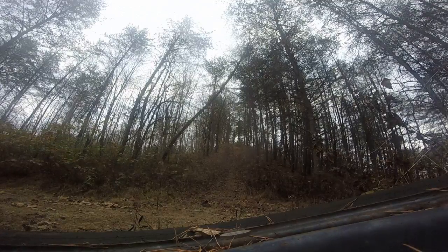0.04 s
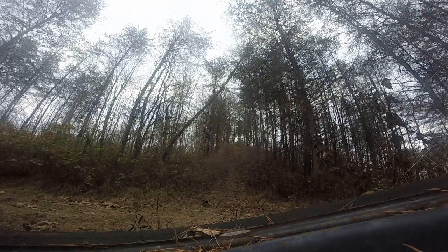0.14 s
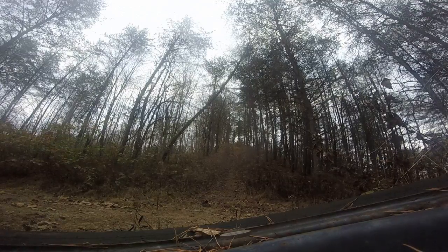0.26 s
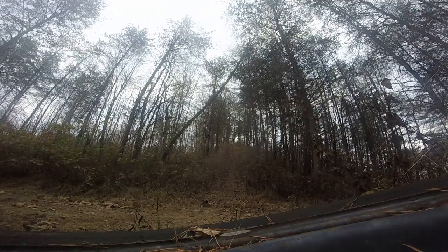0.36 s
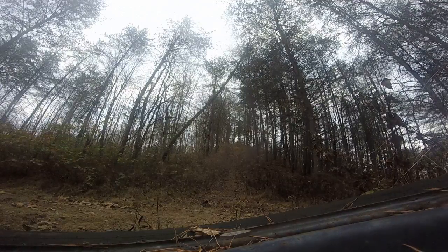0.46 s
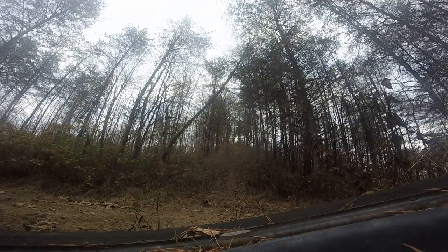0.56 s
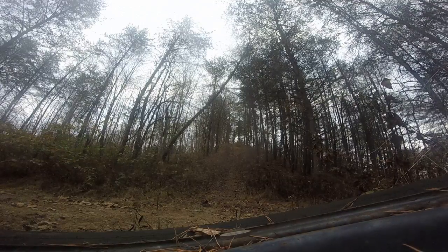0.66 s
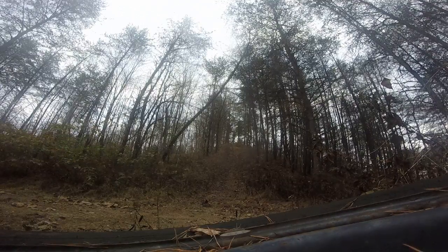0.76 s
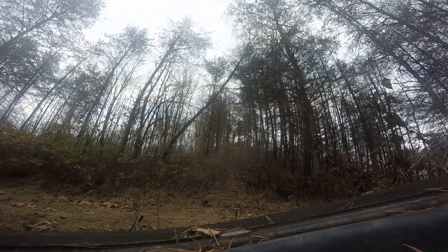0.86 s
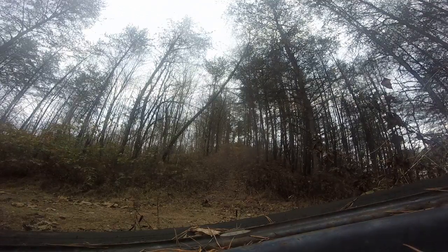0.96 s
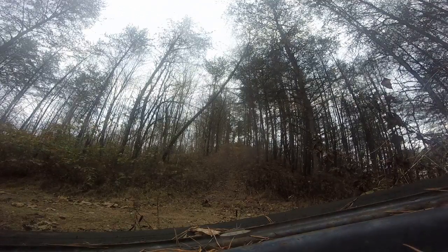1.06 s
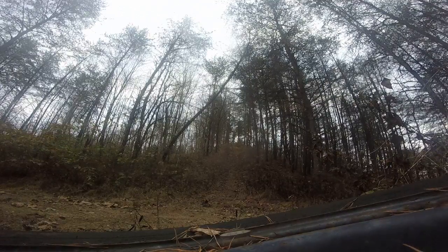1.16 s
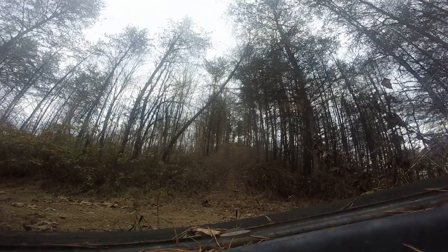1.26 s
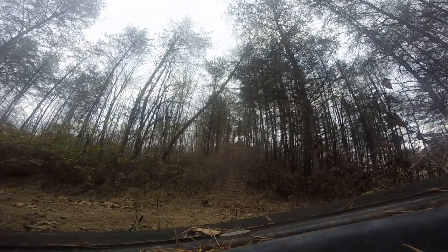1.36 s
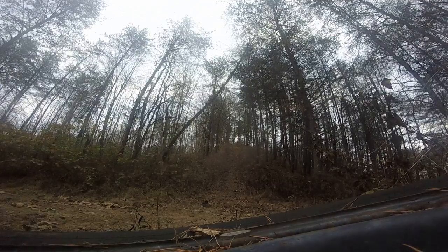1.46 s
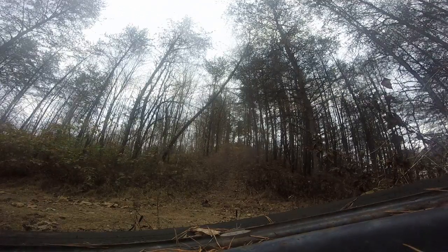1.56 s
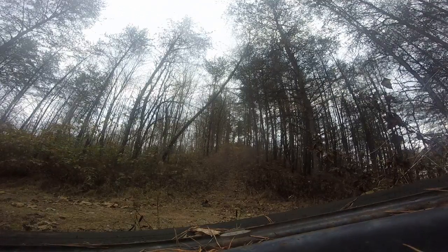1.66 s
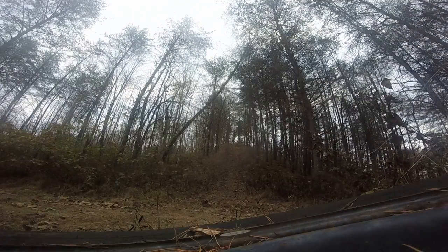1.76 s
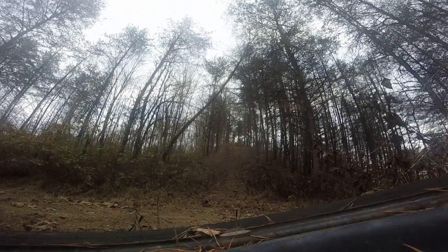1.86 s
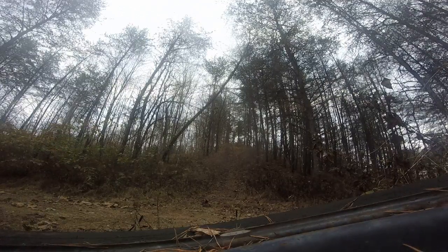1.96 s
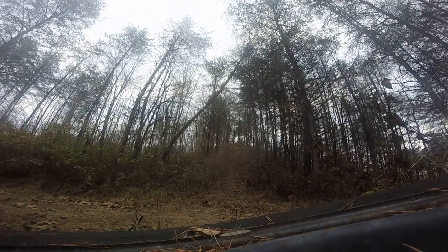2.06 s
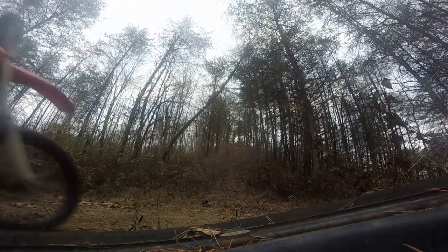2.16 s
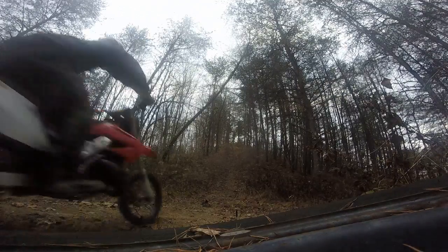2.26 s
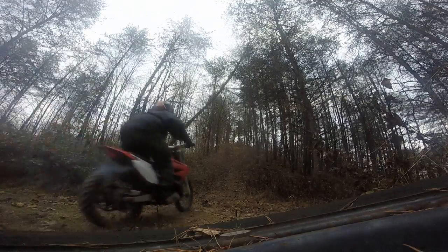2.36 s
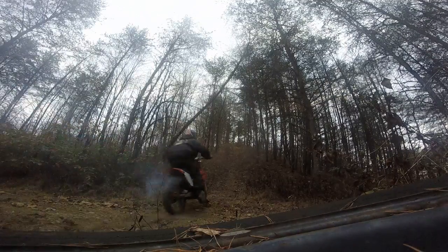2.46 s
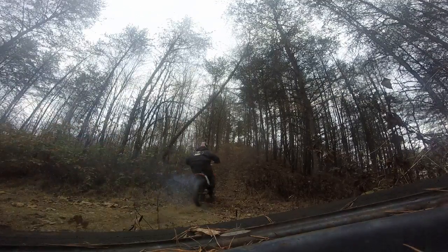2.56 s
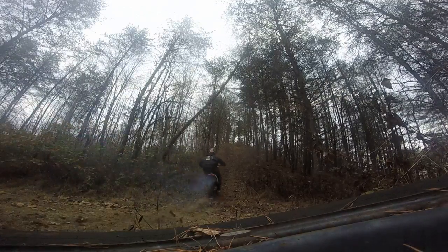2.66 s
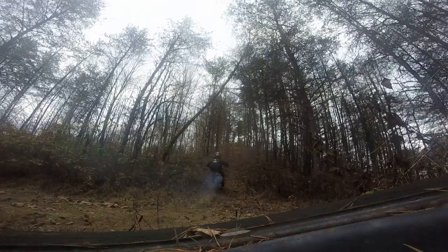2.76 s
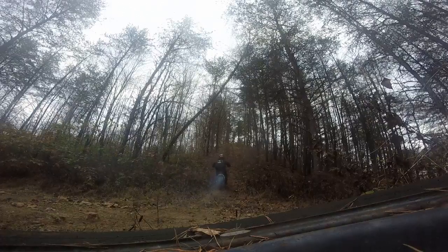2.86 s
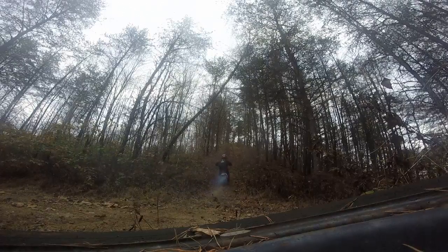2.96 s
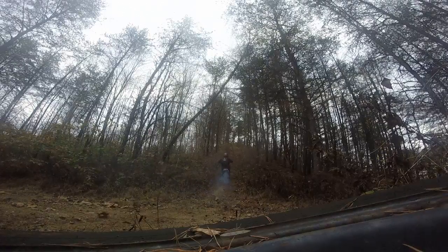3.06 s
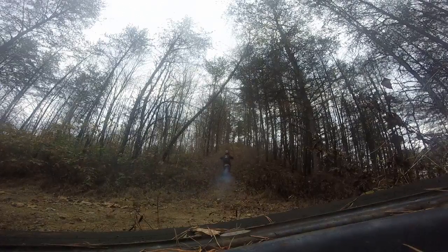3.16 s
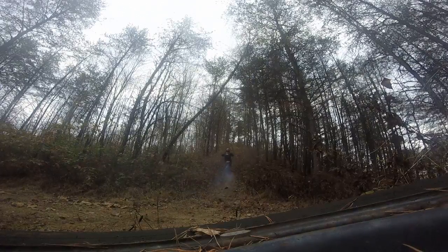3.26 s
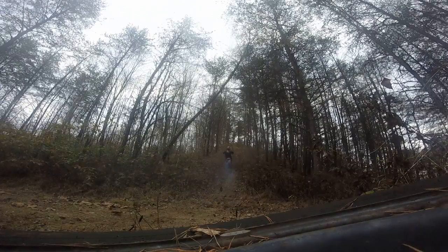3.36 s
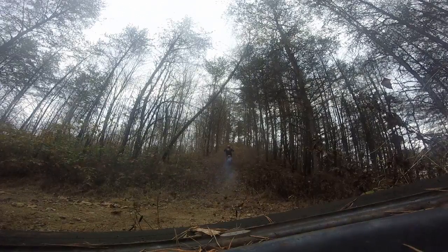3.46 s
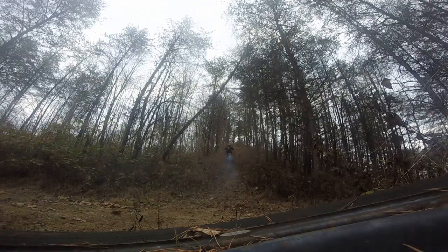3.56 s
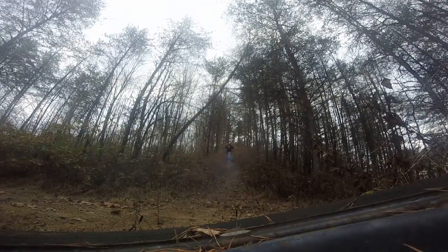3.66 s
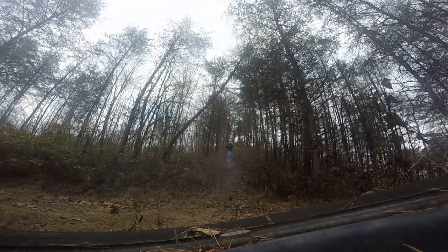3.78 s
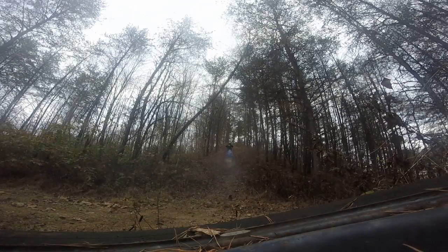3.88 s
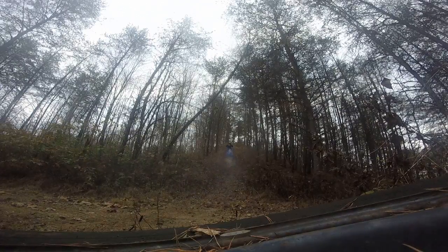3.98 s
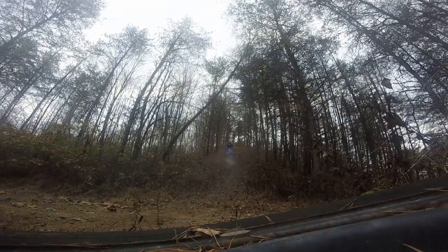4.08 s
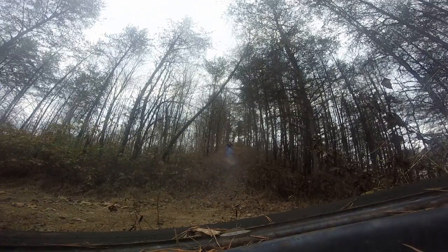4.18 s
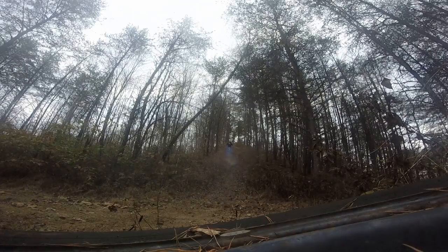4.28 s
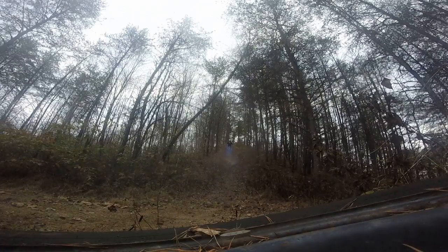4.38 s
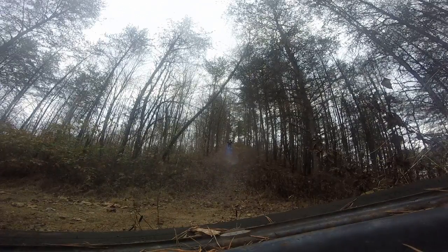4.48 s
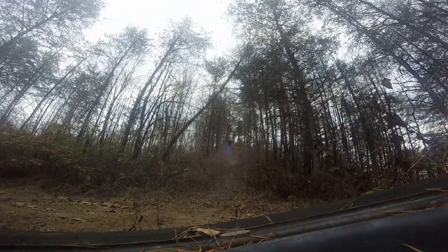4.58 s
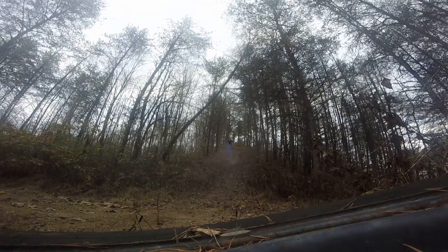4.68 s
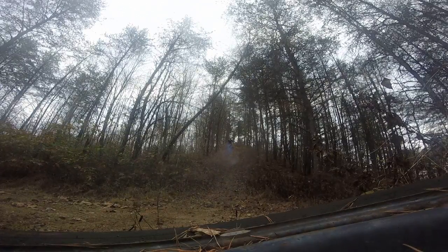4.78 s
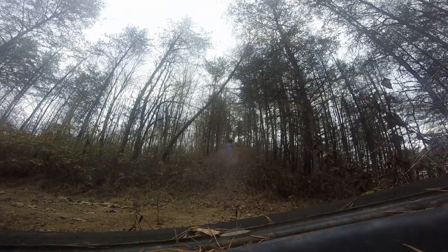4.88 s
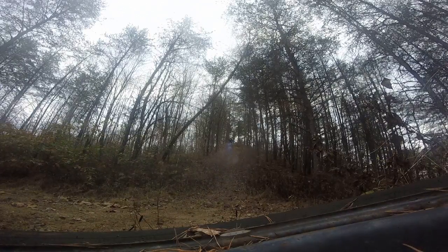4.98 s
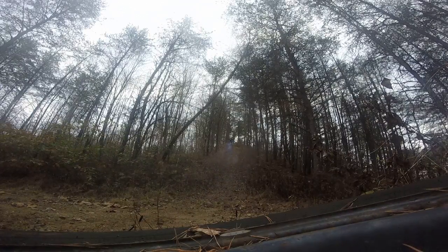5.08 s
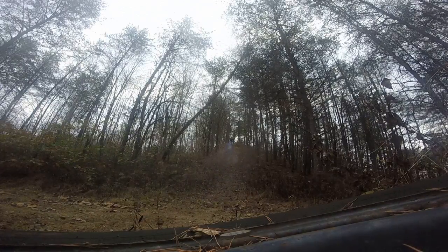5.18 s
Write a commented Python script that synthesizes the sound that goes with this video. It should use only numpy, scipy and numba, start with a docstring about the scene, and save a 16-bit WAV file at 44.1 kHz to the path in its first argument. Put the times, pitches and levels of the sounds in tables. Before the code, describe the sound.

A two-stroke dirt bike buzzes in from behind, blasts past very close with a harsh rasp, then climbs away ringing up a wooded trail.

```python
"""A faint buzz and a short gear whine over rumbling woods come first: a two-stroke dirt bike nears from behind.
It passes close to a listener on the ground and climbs away up a wooded trail. Each firing sends a smooth
pressure wave (sine waves locked to the crank) and a sharp crack (a click that rings the metal) out of the pipe.
The engine side is heard first, the ringing tailpipe once it has passed; echoes off tree trunks blur both.
The back tyre bites with a crunch and sprays dirt and leaves, both made of grainy noise."""
import sys
import numpy as np
from scipy import signal
from scipy.fft import rfft, irfft
from scipy.io import wavfile
from scipy.ndimage import uniform_filter1d
from numba import njit

SR = 44100
rng = np.random.default_rng(int(sys.argv[2]) if len(sys.argv) > 2 else 0)


def generate_wav(signal):
    """Clip the signal to [-1, 1] and save it as 16-bit WAV at the path in sys.argv[1]."""
    frames = np.transpose(np.atleast_2d(signal))
    scaled = np.clip(frames, -1, 1) * 32767
    pcm = np.round(scaled).astype(np.int16)
    wavfile.write(sys.argv[1], SR, pcm)


N = 230622
TIME = np.arange(N) / SR  # seconds
# The exhaust wave in each stage of the ride, from far off, past the listener, to far up the trail.
# Columns: start_s [s, midway through the change], uneven_db [dB, rumble of uneven combustion],
# multiple_1_db to multiple_5_db [dB, multiples of the firing rate]; dB are relative to the drone level
WAVE_SHAPES = [(0.0, -16, -8, 0, -20, -14.5, -32), (0.74, -19.5, -14, -0.5, -21, -17.5, -22.5),
               (1.25, -16, -10, -0.5, -27, -19.5, -40), (1.69, -12.5, -3, -13.5, -17, -26, -20),
               (2.0, -14, 1, -12, -9, -10, -16), (2.17, -11, -1, -11, -13, -11.5, -6),
               (2.35, -8, -7, -0.5, -20.5, -10, -19), (2.55, -10.5, -0.5, -1, -7, -11, -32),
               (3.12, -12, 1.5, -6.5, -12, -12.5, -22), (3.44, -11.5, 0.5, -9, -18.5, -12.5, -7.5),
               (3.82, -13, -3, -1.5, -27, -10.5, -8), (4.12, -12.5, -1, -8.5, -23, -8, -8.5)]
WAVE_CHANGE_S = 0.019  # how gradually one wave shape gives way to the next
PASSED_S, FAR_S = 2.35, 3.91  # the pipe swings into view; the bike is deep in the woods


def bark(turns, surge_hz):
    """The sharp sound in three bands; rasp and hiss swell with rev surges, the body too once the bike has passed."""
    # Overall level of the sharp sound. Columns: time_s [s], level_db [dB]
    bark_levels = [(0.0, -52), (0.24, -48.5), (0.62, -57), (1.55, -41.5), (1.88, -28), (2.11, -13.9),
                   (2.28, -11.5), (2.35, -23.5), (2.59, -19.5), (2.75, -25), (3.0, -24), (3.34, -22),
                   (3.58, -27.5), (3.73, -24.5), (3.84, -31.5), (4.1, -29), (4.5, -30), (4.75, -27.5),
                   (5.23, -32.5)]
    # Sound arriving by way of the trunks. Columns: time_s [s], echo_db [dB over the direct sound]
    trunk_levels = [(0, 5), (1.5, 2), (2.2, -6), (2.55, -11), (2.9, -8), (3.5, -4), (4.0, 0), (5.23, 1)]
    # Brightness in each stage of the ride, relative to the bark. Columns: start_s [s, midway through the change],
    # rasp_db [dB], hiss_db [dB, gas hiss], top_db [dB, extra top treble]; rasp and hiss get a fixed trim below
    brightness = [(0.0, -4.5, -17.5, -18), (0.4, -2, -15, -14), (1.25, -3.5, -13, -13), (1.69, 0, -8, 7.5),
                  (1.93, -2.8, -14, 8.5), (2.17, -8, -16, 1), (2.44, -12.5, -23.5, -4),
                  (2.72, -10, -21.5, 0), (3.25, -8.5, -21, 1)]
    brightness_change_s = 0.037
    body_db_per_hz, rasp_db_per_hz, hiss_db_per_hz = 0.1739, 0.17, 0.12  # gain for each Hz of rev surge

    # the pipe swings about as the bike bounces, more so up the trail
    flutter_spread_db = np.interp(TIME, [PASSED_S, FAR_S], [0.96, 1.76])
    flutter_db = flutter_spread_db * walk(24.036)
    passed = turn_to(PASSED_S, .03)
    direct = (1 - passed) * engine_side(turns) + passed * tailpipe(turns, flutter_db)
    echoes = scatter(direct, t60=0.67, grain_db=6, count=22, size=30)
    heard = direct + undb(curves(trunk_levels)[0]) * echoes

    rasp_db, hiss_db, top_db = stages(brightness, brightness_change_s)
    body_gain = undb(-0.73 + passed * (flutter_db + body_db_per_hz * surge_hz))
    rasp_gain = undb(rasp_db - 2 + rasp_db_per_hz * surge_hz + 0.33 * flutter_db)
    hiss_gain = undb(hiss_db - 1.16 + hiss_db_per_hz * surge_hz)
    body = body_gain * steady(band(heard, 545, 2076))
    rasp = rasp_gain * steady(band(heard, 1829, 4950))
    hiss = hiss_gain * steady(band(heard, 4330, 22300))
    hiss = hiss + (undb(top_db) - 1) * band(hiss, 10500, 23000)
    return undb(curves(bark_levels)[0]) * (body + rasp + hiss)


def engine_side(turns):
    """Intake and cylinder clatter: each blow rattles through the frame, and the intake sucks air once a turn."""
    # Broad colour from the front and from the flank of the bike. Columns: pitch_hz [Hz], level_db [dB]
    front_colour = [(300, -25), (500, -13), (680, -36), (850, -0.5), (1200, 2), (1700, -1), (2100, -7.5),
                    (2900, -9), (3800, -22), (4700, -25), (6500, -6.5), (8700, -10.5), (10000, -22),
                    (14500, -38)]
    flank_colour = [(300, -28), (500, -11), (680, -21), (850, -0.5), (1200, -7), (1700, 0.5), (2100, -10.5),
                    (2900, -11.5), (3800, -21), (4700, -31.5), (6500, -25), (8700, -30.5), (10000, -38.5),
                    (14500, -48.5)]
    # Narrow peaks and dips on top of it. Columns: centre_hz [Hz], width_hz [Hz], peak_db [dB]
    front_modes = [(920, 130, 4), (1200, 200, -3), (1790, 200, 2), (2040, 200, -6), (2560, 170, 3),
                   (2790, 140, -4), (3030, 150, 4), (3230, 140, -7), (3450, 230, 7), (4500, 400, -4),
                   (5200, 350, 5), (6100, 600, -5), (6950, 500, 4)]
    flank_modes = [(930, 90, 2), (1055, 90, 7), (1220, 120, -2), (1445, 90, 6), (1740, 160, 2),
                   (2020, 240, -6), (2350, 200, -3), (2590, 180, 4), (2770, 130, -7), (3030, 190, 6),
                   (3230, 130, -9), (3430, 220, 7), (4150, 200, 2), (5700, 250, -5), (8120, 400, 6)]

    cracks, size = firings(turns, scatter_db=1.8, jitter_s=.00003)
    clatter = unit(scatter(cracks, t60=0.059, grain_db=4.0, count=28, size=3))
    gusts = puffs(turns, size, length=1.0, rest=1.0)
    air = colour(gusts, [(300, -9.5), (1600, -10), (3500, 6.0), (8000, 0.5)])
    front = unit(colour(clatter + undb(9) * air, front_colour, front_modes))
    flank = unit(colour(clatter + undb(1.0) * air, flank_colour, flank_modes))
    beside = turn_to(1.926, 0.065)
    return (1 - beside) * front + beside * flank


def tailpipe(turns, flutter_db):
    """Cracks ring the silencer; above its ringing tones the gas jet takes over."""
    # The cracks lose their edge in the silencer. Columns: pitch_hz [Hz], level_db [dB]
    silencer = [(300, -7.5), (1800, -8.5), (3500, -22.5), (7000, -26)]
    # Colour of the gas jet beside the cracks, weak at low pitch. Columns: pitch_hz [Hz], level_db [dB]
    jet_colour = [(300, -15), (1500, -12), (3000, -3), (7000, 1)]
    # Broad colour from behind, and from far up the hill. Columns: pitch_hz [Hz], level_db [dB]
    rear_colour = [(300, -14), (500, -43), (680, -25), (850, -0.5), (1200, 1), (1700, -5), (2100, -3),
                   (2900, -16), (3800, -16.5), (4700, -30), (6500, -35), (8700, -43.5), (10000, -43),
                   (14500, -71)]
    uphill_colour = [(300, -30), (500, -18), (680, 0.5), (850, 2.5), (1200, 6), (1700, -1), (2100, 5.5),
                     (2900, -8.5), (3800, -13.5), (4700, -28), (6500, -34), (8700, -41.5), (10000, -47),
                     (14500, -68)]
    # Narrow peaks and dips of the pipe. Columns: centre_hz [Hz], width_hz [Hz], peak_db [dB]
    pipe_modes = [(543, 70, 0), (772, 270, -8.5), (876, 310, 11.5), (969, 55, -23), (1257, 73, 9.5),
                  (1591, 210, 8), (1959, 130, -16.5), (2133, 63, 4), (2369, 76, -17), (2825, 290, 6.5),
                  (3230, 140, 1.5), (4120, 230, 2.5), (4630, 730, -10), (8600, 930, 8), (9820, 350, -11)]
    # Strongest ring as throttle and heading change. Columns: time_s [s], pitch_hz [Hz],
    # boost_db [dB, before the flutter is added]
    ring_track = [(2.35, 1109, -2), (2.47, 1160, 15), (2.53, 1160, 10), (2.57, 1536, 13.5),
                  (2.95, 1520, 10.5), (3.05, 1302, 18), (3.19, 1546, 6), (3.31, 1165, 11), (3.5, 1098, -1),
                  (3.7, 1403, 4), (4.5, 1389, -7), (4.67, 1189, 2.5), (5.23, 1309, 2.5)]
    ring_swing = 1.6  # dB the ring gains for each dB of flutter

    cracks, size = firings(turns, scatter_db=0.5, jitter_s=.000025)
    jet = puffs(turns, size, length=.35, rest=.3)
    blows = colour(cracks, silencer) + colour(jet, jet_colour)
    near_pipe = unit(colour(blows, rear_colour, pipe_modes))
    far_pipe = unit(colour(blows, uphill_colour, pipe_modes))
    far = turn_to(FAR_S, 0.12)
    pipe = (1 - far) * near_pipe + far * far_pipe
    ring_hz, boost_db = curves(ring_track)
    ring = resonate(pipe, ring_hz, 200)  # 200 Hz wide
    return pipe + (undb(boost_db + ring_swing * flutter_db) - 1) * ring


def drone(turns, level_db):
    """The round exhaust wave: five sines whose balance follows the ride, each fluttering a little."""
    wave = np.zeros(N)
    for k, shape_db in enumerate(stages(WAVE_SHAPES, WAVE_CHANGE_S)[1:], 1):
        flutter_db = 0.5 * k * walk(35)
        gain = np.sqrt(2) * undb(level_db + shape_db + flutter_db)  # a sine's peak is sqrt(2) times its rms
        wave += gain * np.sin(2 * np.pi * k * turns)
    return wave


def roost():
    """The back tyre bites with a crunch, then throws a short spray of dirt and dry leaves: noise in rough grains."""
    grains = rng.standard_normal(N) * undb(5 * rng.standard_normal(N))
    crunch = colour(grains, [(400, -15), (1200, 10.5), (2200, -3), (3700, -13), (5000, -12), (8000, -14),
                             (15000, -42)])
    spray = colour(grains, [(1000, -20), (3600, -4), (4700, -24), (5700, -1), (6800, -30), (9000, -79),
                            (11500, -21), (15000, -49)])
    bite_gain = undb(-20) * swell(2.368, rise_s=0.015, hold_s=0, fall_s=0.045)
    spray_gain = undb(-37.5) * swell(2.508, rise_s=0.2, hold_s=0.042, fall_s=0.15)
    return bite_gain * unit(crunch) + spray_gain * unit(spray)


def whine(turns, order=9):
    """Gear whine of the first burst of throttle: a wavering tone at nine times the crank speed."""
    level = undb(-54 + 2.4 * walk(50)) * swell(.12, rise_s=.5, hold_s=0, fall_s=0.42)
    return np.sqrt(2) * level * np.sin(2 * np.pi * order * turns + 1.1 * walk(63))


def rumble(drone_db):
    """Uneven combustion fills in between the low lines as noise, over the faint low rumble of the woods."""
    # Colour of the woods. Columns: pitch_hz [Hz], level_db [dB]
    woods_colour = [(15, -18), (25, 4), (82, 1.5), (147, -0.5), (194, 1), (291, -14), (454, -5), (700, -26),
                    (910, -54), (1540, -120)]
    churn_colour = [(30, -28), (60, -4.5), (85, -7.5), (200, 3.5), (350, -6), (600, -6), (900, -5.5),
                    (2000, -32.5)]  # (Hz, dB)
    churn = unit(colour(rng.standard_normal(N), churn_colour))
    woods = unit(colour(rng.standard_normal(N), woods_colour))
    uneven_db = stages(WAVE_SHAPES, WAVE_CHANGE_S)[0]
    churn_gain = np.hypot(undb(drone_db + uneven_db), undb(-57))  # never below -57 dB
    woods_gain = undb(-55.5 + 0.5 * walk(3.1))
    return churn_gain * churn + woods_gain * woods


def firings(turns, scatter_db, jitter_s):
    """One crack per crank turn, each with its own size and timing; also the size of the turn in progress."""
    count = np.arange(1, int(turns[-1]))
    chance = rng.standard_normal((len(count), 2))
    at = (np.interp(count, turns, TIME) + jitter_s * chance[:, 0]) * SR
    size = undb(scatter_db * chance[:, 1])
    # a windowed sinc places each click between samples
    taps = at.astype(int)[:, None] + np.arange(-7, 9)
    offset = taps - at[:, None]
    clicks = size[:, None] * np.sinc(offset) * np.sinc(offset / 8)
    cracks = np.zeros(N)
    np.add.at(cracks, np.clip(taps, 0, N - 1), clicks)
    current = np.clip(turns.astype(int) - 1, 0, len(size) - 1)
    return unit(cracks), size[current]


def puffs(turns, size, length, rest):
    """Gas noise that bursts out as the port opens and dies away within the turn, down to a steady rest."""
    burst = np.exp(-(turns % 1) / length) + rest
    return unit(size * burst * rng.standard_normal(N))


def scatter(x, t60, grain_db, count, size):
    """Many small echoes, blended through count different patterns in turn as the bike moves on."""
    place = np.linspace(0, count - 1, N)
    out = np.zeros(N)
    for k in range(count):
        here = np.flatnonzero(abs(place - k) < 1)
        piece = x[here] * np.cos(np.pi / 2 * (place[here] - k))
        wet = signal.fftconvolve(piece, echo_pattern(t60, grain_db, size))[:N - here[0]]
        out[here[0]:here[0] + len(wet)] += wet
    return out


def echo_pattern(t60, grain_db, size):
    """Uneven echoes fading by 60 dB in t60 seconds, evened out over size bins to add no broad colour."""
    t = np.arange(int(SR * t60)) / SR
    noise, unevenness = rng.standard_normal((2, len(t)))
    fade = np.exp(-np.log(1000) * t / t60)
    spectrum = rfft(noise * undb(grain_db * unevenness) * fade, 2 * len(t))
    even = steady(abs(spectrum), size) * np.exp(1j * np.angle(spectrum))
    echoes = irfft(even)[:len(t)]
    return echoes / np.linalg.norm(echoes)


def colour(x, points, modes=()):
    """Ring x through a body with a broad colour and narrow peaks and dips; it rings only after each blow."""
    freq = np.maximum(np.arange(2049) * SR / 4096, 1)
    hz, db = np.transpose(points)
    shape_db = np.interp(np.log(freq), np.log(hz), db)
    for centre, width, peak_db in modes:
        shape_db = shape_db + peak_db / (1 + (2 * (freq - centre) / width) ** 2)
    # folding the cepstrum (the spectrum of the log spectrum) puts all the ringing after the blow
    cepstrum = irfft(np.log(undb(shape_db)))
    half = len(cepstrum) // 2
    cepstrum[1:half] *= 2
    cepstrum[half + 1:] = 0
    response = irfft(np.exp(rfft(cepstrum)))[:half]
    return signal.fftconvolve(x, response)[:N]


@njit
def resonate(x, hz, width):
    """A resonance with a moving centre: a state-variable band-pass filter, width in Hz."""
    y, b, l = np.empty(len(x)), 0., 0.  # b and l hold the band and low states
    for i in range(len(x)):
        g, k = np.tan(np.pi * hz[i] / SR), width / hz[i]
        v = (b + g * (x[i] - l)) / (1 + g * (g + k))
        b, l, y[i] = 2 * v - b, l + 2 * g * v, k * v
    return y


def band(x, lo_hz, hi_hz, order=4):
    """Keep one band without delay; the upper edge stops just short of half the sample rate."""
    sos = signal.butter(order, [lo_hz, min(hi_hz, .49 * SR)], "band", fs=SR, output="sos")
    return signal.sosfiltfilt(sos, x)


def undb(db):
    """Decibels to gain."""
    return 10 ** (np.asarray(db) / 20)


def unit(x):
    """Scale to rms 1 (rms is a kind of average strength)."""
    return x / np.sqrt(np.mean(x ** 2))


def steady(x, size=1400):
    """Scale to a running rms of 1."""
    power = uniform_filter1d(uniform_filter1d(x ** 2, size), size)
    return x / np.sqrt(power + 1e-12)


def walk(rate):
    """Smooth random wander with spread 1, heading for a new value rate times a second."""
    k = int(SR / rate)
    steps = np.repeat(rng.standard_normal(N // k + 1), k)
    return unit(uniform_filter1d(steps, k)[:N])


def curves(table):
    """The columns of a table, joined by straight lines in time."""
    s, *columns = np.transpose(table)
    return [np.interp(TIME, s, c) for c in columns]


def stages(table, change_s):
    """The columns of a table, each row held until the next one takes over."""
    rows = np.array(table)
    held = rows[0, 1:, None]
    for old, new in zip(rows, rows[1:]):
        held = held + (new[1:] - old[1:])[:, None] * turn_to(new[0], change_s)
    return held


def turn_to(at_s, span_s):
    """Smooth change-over from 0 to 1, half done at at_s."""
    return .5 + .5 * np.tanh((TIME - at_s) / span_s)


def swell(at_s, rise_s, hold_s, fall_s):
    """Rise, hold and fall; each slope changes by 20 dB in its time."""
    before = np.maximum(at_s - TIME, 0) / rise_s
    after = np.maximum(TIME - at_s - hold_s, 0) / fall_s
    return undb(-20 * (before + after))


def scene():
    """One crank drives every engine sound; it wavers slightly throughout from unevenness, more on the upper trail."""
    # Engine speed before the waver is added. Columns: time_s [s], firing_hz [Hz]
    revs = [(0.0, 94.95), (0.18, 113.7), (0.62, 95.5), (0.75, 85.1), (0.9, 83.5), (1.28, 108), (1.6, 110.5),
            (1.72, 133.7), (1.85, 125.2), (1.89, 139.2), (2.03, 123.1), (2.1, 143.4), (2.18, 130.8),
            (2.25, 134.2), (2.31, 152.4), (2.38, 131), (2.53, 133.7), (2.57, 140.2), (2.75, 145.4),
            (2.8, 135.6), (2.85, 150.5), (3.01, 143.7), (3.05, 155.2), (3.11, 136.6), (3.35, 154),
            (3.44, 144.9), (3.47, 160.3), (3.61, 143.7), (3.7, 171.5), (3.79, 171.9), (3.85, 120.6),
            (3.89, 139.5), (4.06, 129.6), (4.11, 146.3), (4.16, 132.2), (4.36, 138.4), (4.4, 134.6),
            (4.56, 135.8), (4.62, 141.4), (4.98, 146.9), (5.23, 137.6)]
    # Level of the round exhaust wave before surges are added. Columns: time_s [s], level_db [dB]
    drone_levels = [(0.0, -50.5), (0.27, -46), (0.38, -54.5), (0.73, -65), (0.76, -44.5), (0.86, -46.5),
                    (1.08, -40.5), (1.65, -35), (2.0, -32), (2.1, -30.5), (2.36, -33.5), (2.6, -32.5),
                    (3.45, -32), (3.62, -34), (3.72, -31.5), (3.84, -41.5), (4.12, -39), (5.23, -43.5)]
    waver_near, waver_far = 0.004987, .021  # spread as a share of the revs, before and on the upper trail
    waver_hz = 17  # new random speed offsets each second
    surge_s, drone_db_per_hz = 0.1, 0.11  # revs above their running mean are louder

    waver = waver_near + (waver_far - waver_near) * turn_to(4.05, .12)
    hz = curves(revs)[0] * (1 + waver * walk(waver_hz))
    turns = np.cumsum(hz) / SR
    surge_hz = hz - uniform_filter1d(hz, int(surge_s * SR))
    drone_db = curves(drone_levels)[0] + drone_db_per_hz * surge_hz
    bike = bark(turns, surge_hz) + drone(turns, drone_db) + whine(turns)
    return (bike + roost() + rumble(drone_db))[None]


def record(dry):
    """Round off the highest peaks, then cut the treble steeply above 15100 Hz."""
    rounded = np.tanh(0.94 * dry) / 0.86
    return signal.sosfilt(signal.ellip(10, .2, 70, 15100, fs=SR, output="sos"), rounded)


dry = scene()
out = record(dry)
generate_wav(out)
```